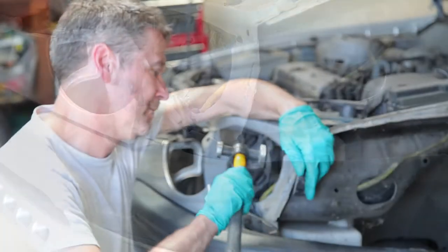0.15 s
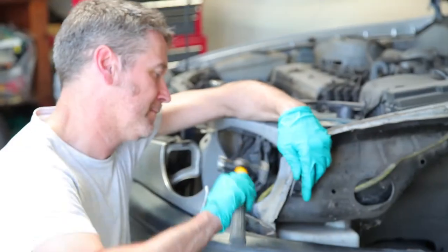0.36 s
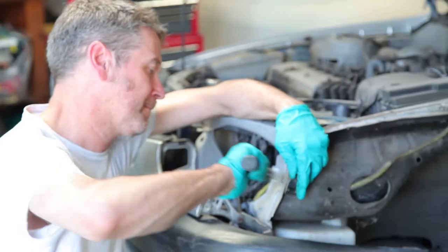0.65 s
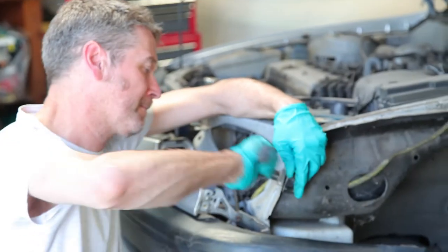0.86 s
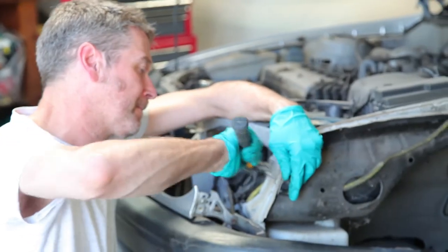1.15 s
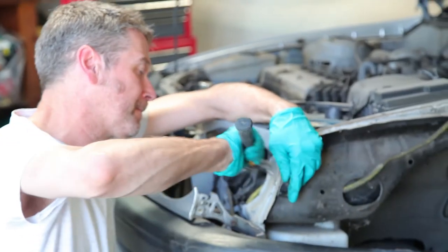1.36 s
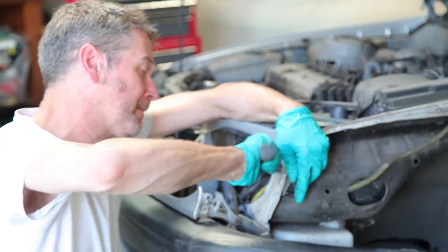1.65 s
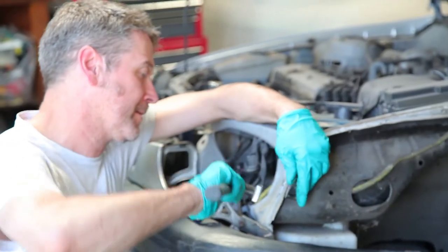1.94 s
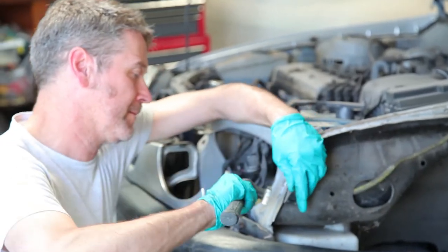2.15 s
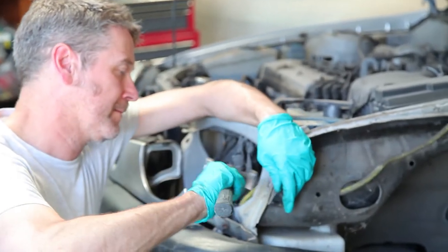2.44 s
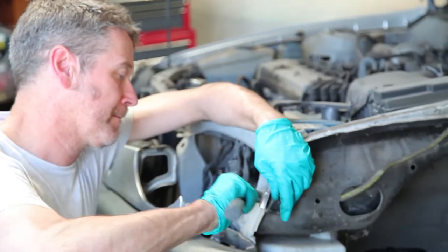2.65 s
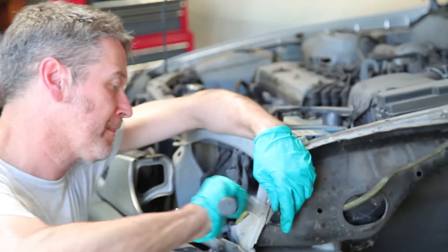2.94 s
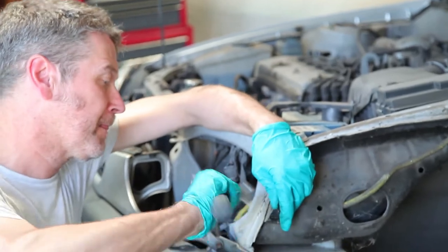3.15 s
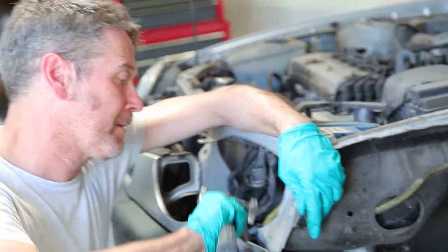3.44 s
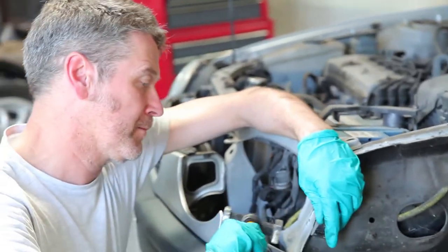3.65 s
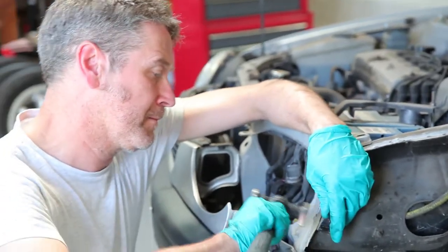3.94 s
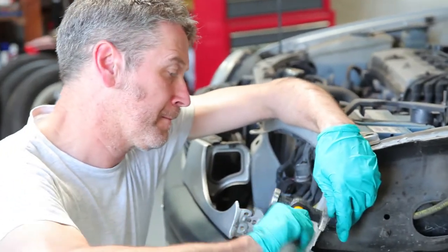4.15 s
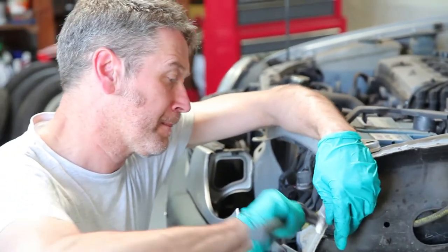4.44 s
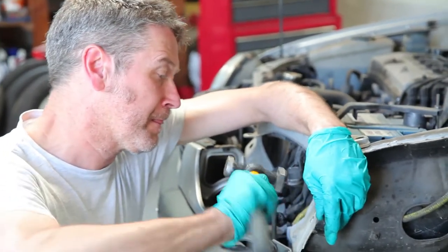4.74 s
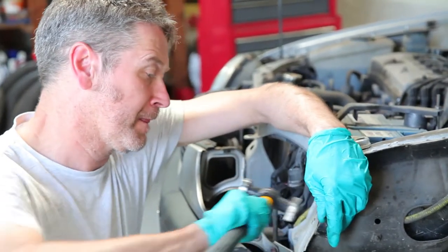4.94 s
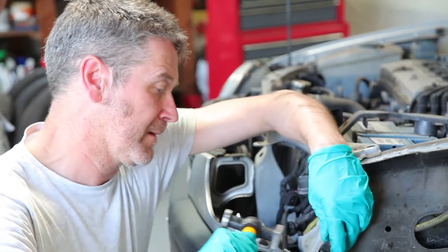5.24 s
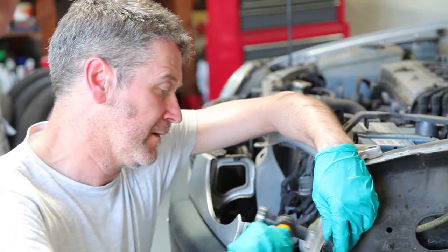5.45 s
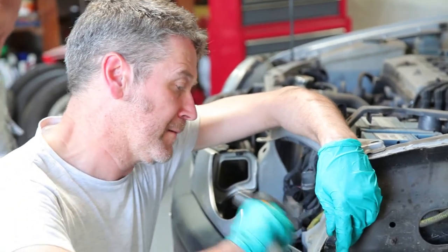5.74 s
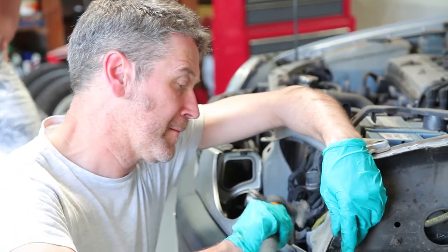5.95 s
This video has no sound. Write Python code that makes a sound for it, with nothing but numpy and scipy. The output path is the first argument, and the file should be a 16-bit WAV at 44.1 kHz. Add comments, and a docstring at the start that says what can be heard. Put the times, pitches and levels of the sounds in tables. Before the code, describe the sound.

Loud metallic hammer blows clang on a car body panel in short bursts, with bright crashes, garage echoes and distorted peaks.

```python
"""In a garage, a hammer beats bent sheet steel on a car body in four quick runs, close to the microphone.
Each blow is a set of swelling body tones, a broad crash of filtered noise and narrow noise bands
for the clang of the sheet and the ring of the hammer head.
Decaying noise makes the echoes of the garage, over a quiet hum and hiss with a throbbing sizzle.
The loudest moments overload the converter and are clipped flat."""
import sys
import numpy as np
from scipy import signal
from scipy.fft import rfft, irfft
from scipy.io import wavfile
from scipy.ndimage import uniform_filter1d

SR = 44100
rng = np.random.default_rng(int(sys.argv[2]) if len(sys.argv) > 2 else 0)


def transcribe(u):
    """Save the signal u as a 16-bit wav file named by the first command-line argument.

    u: samples, shape (n,) or (channels, n), limited to [-1, 1]; the rate is SR.
    q: integer samples, one column per channel.
    """
    v = np.clip(np.atleast_2d(u).T, -1, 1)
    q = np.round(v * 32767).astype(np.int16)
    wavfile.write(sys.argv[1], SR, q)


N = 268128  # length in samples, about 6 seconds
BANDS_HZ = 32 * 2 ** np.arange(0, 9.1, .5)  # band centres half an octave apart
BANDS_FINE_HZ = 32 * 2 ** np.arange(0, 9.1, .25)  # a quarter octave apart


def undb(db):
    """Turn decibels into a gain."""
    return 10 ** (np.asarray(db) / 20)


def level(x, db):
    """Scale a sound to an rms level in dB."""
    return x * undb(db) / np.sqrt(np.mean(x ** 2))


def along(table, hz, axis):
    """Read one column of a table at any pitch, on a log-frequency axis."""
    table = np.array(table, float)
    return np.interp(np.log(hz), np.log(table[:, 0]), table[:, axis])


def band(hz, size, octaves=0.49, skirts=False):
    """Noise in one band: a cosine hump, or a resonance with wide skirts."""
    away = np.log2((np.fft.rfftfreq(size, 1 / SR) + 1e-9) / hz) / octaves
    if skirts:
        shape = 1 / (1 + away ** 2)
    else:
        shape = np.cos(np.pi / 2 * np.clip(away, -1, 1))
    return irfft(rfft(rng.standard_normal(size)) * shape, size)


def stereo(hz, size, like, octaves=0.56, skirts=False):
    """Left and right noise in one band, alike by the given share from 0 to 1."""
    like = np.clip(like, 0, 1)
    mid = band(hz, size, octaves, skirts) * np.sqrt((1 + like) / 2)
    side = band(hz, size, octaves, skirts) * np.sqrt((1 - like) / 2)
    return np.array([mid + side, mid - side])


def kicks(s, gain):
    """One impulse for each event time in seconds."""
    x = np.zeros(N)
    x[(np.asarray(s) * SR).astype(int)] = gain
    return x


def fade(x, t60):
    """Let every impulse die away by 60 dB in t60 seconds."""
    keep = 1000 ** (-1 / (max(t60, 1e-3) * SR))  # share left after one sample
    return signal.lfilter([1], [1, -keep], x)


def mode(x, hz, t60):
    """Let every impulse start a dying sine, as a struck resonance does."""
    turn = np.exp(2j * np.pi * hz / SR - np.log(1000) / (t60 * SR))
    return signal.lfilter([1], [1, -turn], x).imag


# The hammer blows and two rebounds.
# Each row: start in seconds, strength in dB, boom in dB, hardness in dB per octave,
# spot from 0 (flange) to 1 (face), clang pitch in Hz, clang in dB, ring pitch in Hz, ring in dB.
BLOWS = [(0.5497, 5, 2.5, -1.5, 0.49, 835, 22, 3980, 7.5), (0.82, 5.5, 2, -1.3, 0.06, 1950, 5, 7800, -4),
         (1.059, 4, -8.5, -5, 0.31, 391, 13.5, 3980, -5), (1.274, 3.5, 5, 0, 0.35, 7820, 3, 4030, 16),
         (1.475, 6, -1, -1, 0.11, 2500, 12, 2100, 9), (1.6509, -0.5, 6.5, 1.5, 0.054, 920, 11, 6650, 22.5),
         (2.586, 1.5, -0.5, -2.5, 0.61, 590, 13.5, 4500, -4), (2.855, 8, -2, 0, 0.78, 2050, 14.5, 3980, 10),
         (3.067, 8.5, -16, -1.54, 0.54, 1300, 16, 6300, 17),
         (3.097, -8, -3.5, -5.5, 0.44, 895, 7, 7120, 4.5), (3.249, 7, 2, 0.9, 1, 3870, 7, 5880, 2.5),
         (4.1437, 1.5, 4.5, 0, 0.85, 880, 17, 4100, 3.5), (4.165, -6.5, 5.5, -0.5, 0.42, 2700, 9, 5880, -5),
         (4.387, 7, 7, 2, 0.95, 1060, 22, 3980, 17), (4.604, 5.5, 6, 1.76, 0.71, 790, -1, 3600, 11.5),
         (4.808, 11.5, -6, 0.37, 0.82, 800, 10, 3980, 18), (5.795, 0, 12, 1, 1, 1042, 12, 590, 20.5),
         (6.045, 2, 11.5, 3.8, 0.94, 800, 6, 3900, 14.5)]
THUD_FLANGE_DB, THUD_FACE_DB = -6, 6.5  # lift of the deep bass by where the blow lands
MIDDLE_DB = 2.5  # lift near 900 Hz
EDGE_DB, EDGE_PER_HARDNESS = 9, -1.1  # lift above 5 kHz, larger for soft contacts


def force_db(hz):
    """Spectrum of each blow: a harder contact tilts it to the treble, the face of the panel thuds deeper."""
    strength_db, boom_db, hard, spot = np.transpose(BLOWS)[1:5]
    thud = 1 / (1 + (hz / 150) ** 4)
    boom = 1 / (1 + (hz / 550) ** 4)
    middle = np.exp(-(np.log2(hz / 900) / 0.56) ** 2)
    edge = 1 / (1 + (5000 / hz) ** 4)
    thud_db = THUD_FLANGE_DB + spot * (THUD_FACE_DB - THUD_FLANGE_DB)
    edge_db = EDGE_DB + EDGE_PER_HARDNESS * hard
    bass_db = thud * thud_db + boom * boom_db
    return strength_db + hard * np.log2(hz / 1000) + bass_db + middle * MIDDLE_DB + edge * edge_db


def driven(hz, reach):
    """How hard each blow drives a group of modes: most those near its clang and its ring pitch."""
    clang_hz, clang_db, ring_hz, ring_db = np.transpose(BLOWS)[5:]

    def near(pitch, db):
        return db - 6 * (np.log2(hz / pitch) / reach) ** 2

    return undb(near(clang_hz, clang_db)) + undb(near(ring_hz, ring_db))


# Single low modes (natural tones) of panel and body.
# Each row: pitch in Hz, relative dB when struck on the flange, relative dB when struck on the face,
# time to full swing in seconds.
PANEL = [(98.8, -31, -31, 0.035), (126.4, -24.5, -27.5, 0.042), (173.5, -26, -25.5, 0.044),
         (233.9, -26, -10.5, 0.031), (319, -18, -15, 0.017), (396.3, 2, -7.5, 0.015),
         (494.3, -13, -10, 0.024), (570, -14, -6, 0.023), (658.4, -18, -15, 0.038), (757, -12, -2.5, 0.014),
         (855.4, -12, -6, 0.023), (957.5, -7, -9.5, 0.013), (1032, -9, -10, 0.017), (1080, -6, -24, 0.019),
         (1308, -17.5, -12, 0.026), (1423, -12.5, -9.5, 0.011), (1474, -15, -16.5, 0.034),
         (1703, -10.5, -13.5, 0.027), (1856, 3, -3, 0.0036), (2142, -25, -10.5, 0.0098),
         (2300, -18, -18.5, 0.039), (2452, -23, -5.5, 0.0044)]
PANEL_DB = -15.5
SCATTER_DB, DETUNE = 2.5, .015  # typical change of mode level and pitch (share) as the sheet bends


def body_modes(seconds=0.22):
    """The low modes of panel and body: each swells for 4 to 44 ms after a blow, then is damped at once."""
    hz, flange_db, face_db, full = np.transpose(PANEL)[:, :, None]
    t = np.arange(int(seconds * SR)) / SR
    swing = (t / full) ** 2 * np.exp(2 * (1 - t / full))
    blow_db = force_db(hz)
    luck = rng.standard_normal((len(BLOWS), 3, len(PANEL), 1))
    out = np.zeros(N + len(t))
    for k, (blow, (size, tune, phase)) in enumerate(zip(BLOWS, luck)):
        spot_db = flange_db + blow[4] * (face_db - flange_db)
        db = PANEL_DB + blow_db[:, [k]] + spot_db + SCATTER_DB * size
        tones = np.sin(2 * np.pi * (hz * (1 + DETUNE * tune) * t + phase))
        start = int(blow[0] * SR)
        out[start:start + len(t)] += np.sum(undb(db) * swing * tones, axis=0)
    return out[:N]


WASH_DB = -7


def dense(hz, octaves, push, t60, tick_db, skirts=False):
    """A band of close modes: tick and quick crash, then the diffuse wash that the garage makes of it."""
    like = along(GARAGE, hz, axis=3)
    # bending waves spread slowly in the bass, so low bands swell for some cycles
    crash = fade(push, t60) - fade(push, 11.1 / hz) + undb(tick_db) * fade(push, 0.0025)
    tail = fade(push, along(GARAGE, hz, axis=1)) - fade(push, 0.007)
    wash = undb(WASH_DB + along(GARAGE, hz, axis=2)) * tail
    crash_noise = stereo(hz, N, like ** 0.085, octaves, skirts)  # nearly the same on both sides
    wash_noise = stereo(hz, N, like, octaves, skirts)
    return np.array([crash * crash_noise, wash * wash_noise])


# Sheet modes too dense to tell apart.
# Each row: pitch in Hz, relative level per hertz in dB, time to die by 60 dB in seconds.
CRASH = [(40, -65, 0.088), (155, -14.5, 0.11), (467, 0.5, 0.15), (910, -5.5, 0.18), (2560, -1.5, 0.14),
         (4760, -16, 0.13), (6480, -23, 0.14), (9650, -22, 0.071), (14900, -32.5, 0.012)]
CRASH_DB, TICK_DB = 5.5, 0
# Clusters of hammer head modes.
# Each row: pitch in Hz, half width in octaves, time to die by 60 dB in seconds.
HEAD = [(3980, .04, .04), (5880, .04, .04), (7120, .042, .04)]
# Groups of close sheet modes that clang.
# Each row: pitch in Hz, half width in octaves, time to die by 60 dB in seconds.
CLANGS = [(391, 0.16, 0.053), (595, 0.041, 0.13), (819, .065, 0.19), (1027, 0.019, 0.4), (1340, 0.14, 0.13),
          (1970, 0.18, 0.14), (2570, 0.15, 0.077), (3620, 0.099, 0.12), (4360, 0.043, 0.065),
          (7950, 0.19, 0.063)]
# octaves from a blow's clang or ring pitch at which a group is driven 6 dB weaker
HEAD_REACH, SHEET_REACH = 0.13, .085


def sheet():
    """The broad crash of the sheet, the ring of the hammer head and the clang of mode groups."""
    s = np.transpose(BLOWS)[0]
    out = 0  # becomes the pair of direct sound and wash
    for hz in BANDS_HZ:
        push = kicks(s, undb(CRASH_DB + force_db(hz) + along(CRASH, hz, axis=1)))
        out = out + dense(hz, 0.48, push, along(CRASH, hz, axis=2), TICK_DB - CRASH_DB)
    for groups, reach, tick_db in ((HEAD, HEAD_REACH, 2.4), (CLANGS, SHEET_REACH, -18)):
        for hz, octaves, t60 in groups:
            push = kicks(s, driven(hz, reach))
            out = out + dense(hz, octaves, push, t60, tick_db, skirts=True)
    return out


# Soft bumps of the tool.
# Each row: start in seconds, level in dB, pitch in Hz, time to die by 60 dB in seconds.
KNOCKS = [(2.363, -35, 860, 0.059), (3.904, -33, 214, 0.16), (5.495, -25, 325, 0.057),
          (5.51, -35, 655, 0.1)]


def bumps(soft_s=0.034):
    """Dull knocks of the tool between the runs; a soft contact lets them swell."""
    out = 0
    for s, db, hz, t60 in KNOCKS:
        push = kicks([s], undb(db))
        # taking away a faster decay softens the start
        out = out + mode(push, hz, t60) - mode(push, hz, soft_s)
    return out


# How the garage echoes.
# Each row: pitch in Hz, time to die by 60 dB in seconds, echo level in dB,
# likeness of left and right from 0 to 1.
GARAGE = [(60, 1, 8.5, 1), (160, 0.81, -5.5, 0.9), (446, 0.73, -5, 0.76), (1110, 0.94, -5.5, 0.67),
          (2920, 0.82, -7.5, 0.52), (6750, 0.57, -2, 0.46), (16100, 0.11, -7, 0.1)]


def garage(x, seconds=1.0, gap_s=0.00043):
    """Echoes of walls and car bodies: a noise response that decays band by band."""
    size = int(seconds * SR)
    t = np.arange(size) / SR
    response = 0
    for hz in BANDS_HZ:
        t60 = along(GARAGE, hz, axis=1)
        even = np.sqrt(2 * np.log(1000) / (t60 * SR))  # same energy however long the decay
        envelope = 1000 ** (-t / t60) * even * (1 - np.exp(-(t / gap_s) ** 2))
        noise = stereo(hz, size, along(GARAGE, hz, axis=3))
        response = response + undb(along(GARAGE, hz, axis=2)) * envelope * noise
    return signal.fftconvolve(x[None], response, axes=1)[:, :N]


# Ring left by an earlier blow.
# Each row: pitch in Hz, width in Hz, relative level in dB.
EARLIER = [(430, 37, -1), (875, 60, 5.5), (1250, 31, -7), (1950, 98, -12), (2310, 26, -14)]
EARLIER_DB, EARLIER_T60_S = -34, 0.74  # level at the start, time to die by 60 dB


def earlier():
    """The reverberant end of a blow struck before the start: resonant noise that dies away."""
    f = np.fft.rfftfreq(N, 1 / SR)
    colour = sum(undb(db) / np.sqrt(1 + (2 * (f - hz) / width) ** 2) for hz, width, db in EARLIER)
    mid, side = irfft(rfft(rng.standard_normal((2, N))) * colour, N)
    ring = level(np.array([mid + 0.52 * side, mid - .4 * side]), EARLIER_DB)
    return ring * 1000 ** (-np.arange(N) / SR / EARLIER_T60_S)


# Colour of the hum and hiss.
# Each row: pitch in Hz, relative level per hertz in dB.
AIR = [(15, -51), (25, -21), (37, -17), (107, -1.5), (126, 1.5), (183, -0.5), (216, -1), (253, -2),
       (554, -1.5), (2370, -8), (6000, -10), (8600, -11), (9600, -7), (15700, -34)]
AIR_DB, AIR_LIKE = -44.5, 0.57  # rms level, likeness of left and right from 0 to 1
# A faint sizzle near 8.5 kHz that throbs in threes.
# Each row: middle of the first throb in seconds, gain in dB.
SIZZLE = [(.09, -64), (1.99, -50)]
THROB_S = .152  # from one throb to the next


def air():
    """Hum and hiss of the garage, each band wavering a little, with a throbbing sizzle on top."""
    out, step = 0, SR // 6
    for hz in BANDS_FINE_HZ:
        steps_db = np.repeat(rng.standard_normal(N // step + 1), step)
        waver_db = uniform_filter1d(steps_db, step)[:N]
        out = out + undb(along(AIR, hz, axis=1) + waver_db) * stereo(hz, N, AIR_LIKE, .25)
    beats = sum(kicks(s + THROB_S * np.arange(3), undb(db)) for s, db in SIZZLE)
    throb = signal.fftconvolve(beats, np.hanning(int(.07 * SR)), mode="same")
    sizzle = level(band(8500., N, .08), -3) + level(band(8500., N, .6), 0)
    return level(out, AIR_DB) + throb * sizzle


LEFT_DB = 1.5  # how much louder the direct sound is on the left
CRASH_ECHO_DB = -8  # share of the crash that returns with the colour of the walls


def scene():
    """Direct sound a little to the left, its echoes and the background."""
    body = body_modes() + bumps()
    crash, wash = sheet()
    direct = (body + crash) * undb([[LEFT_DB / 2], [-LEFT_DB / 2]])
    echoes = wash + garage(body + undb(CRASH_ECHO_DB) * crash.mean(axis=0))
    return direct + echoes + earlier() + air()


MIC_HZ, MIC_SHELF_DB = 8900, -5  # the microphone goes dull above this pitch, by this much
HISS_DB = -58
TOP_HZ = 15750  # hardly anything is left above this


def record(dry):
    """The microphone dulls the top, the preamplifier hisses, the converter clips; then the top is cut."""
    low = signal.sosfilt(signal.cheby1(5, 1, MIC_HZ, fs=SR, output="sos"), dry)
    high = signal.sosfilt(signal.butter(4, 1.12 * MIC_HZ, "high", fs=SR, output="sos"), dry)
    hiss = undb(HISS_DB) * rng.standard_normal(dry.shape)
    clipped = np.clip(low + undb(MIC_SHELF_DB) * high + hiss, -1, 1)
    return signal.sosfilt(signal.ellip(10, .2, 75, TOP_HZ, fs=SR, output="sos"), clipped)


dry = scene()
out = record(dry)
transcribe(out)
```